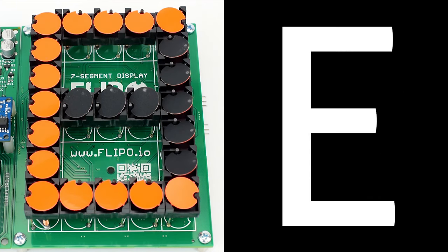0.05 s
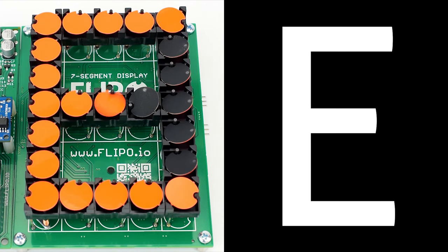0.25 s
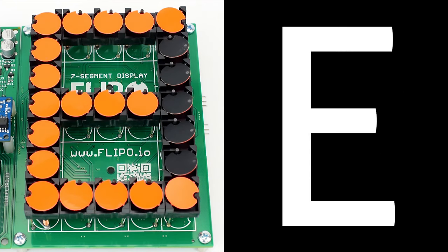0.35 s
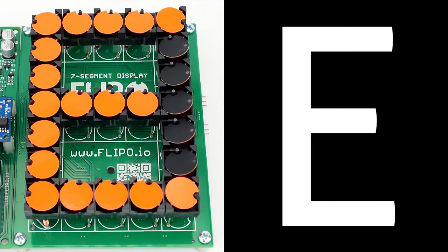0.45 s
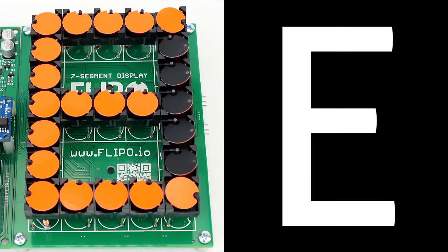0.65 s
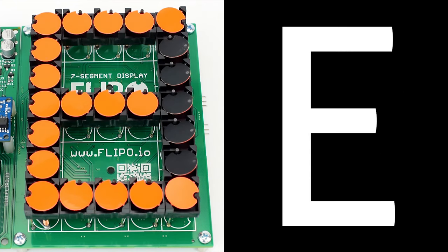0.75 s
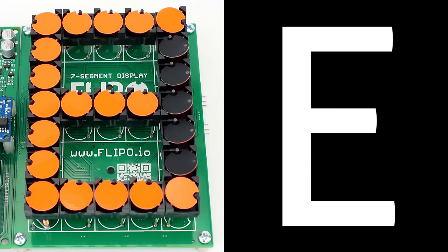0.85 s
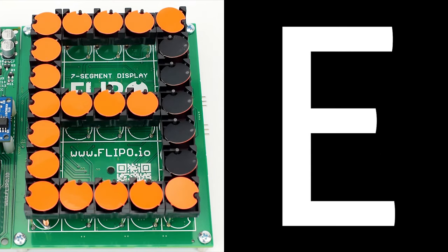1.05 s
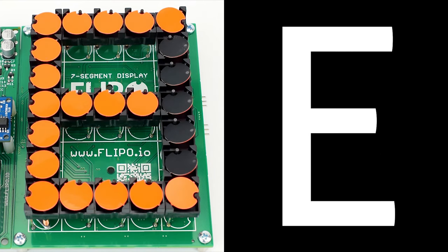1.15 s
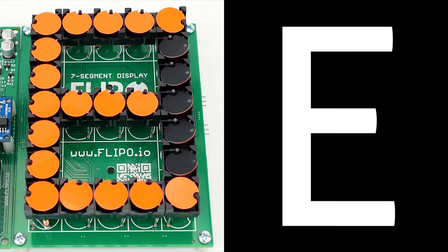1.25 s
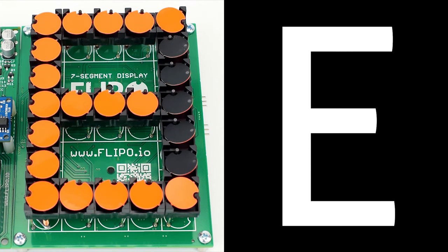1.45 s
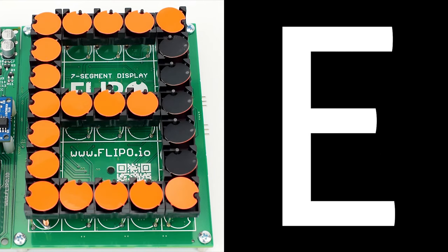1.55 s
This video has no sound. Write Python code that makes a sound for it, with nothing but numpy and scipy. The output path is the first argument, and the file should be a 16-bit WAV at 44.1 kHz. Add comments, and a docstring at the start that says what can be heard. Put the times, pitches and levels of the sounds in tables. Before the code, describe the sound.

Close up in a small quiet room, light plastic discs snap against their stops in a fast run of crisp double clicks with brief rattles, then only soft hiss and a barely audible late tick.

```python
"""Flip-disc display, close up

A few small plastic discs turn over, one every twentieth of a second; faint flips sound near the end.
Each slaps its stop, chatters and rebounds: clicks set damped modes of disc, frame and board ringing.
A quiet room adds dense noise reflections and a hiss of shaped noise bands.
Behind it lie a faint drone of narrow noise and a far cricket, a pulsed, wavering near sine.
"""
import sys
import numpy as np
from scipy import signal
from scipy.io import wavfile
from scipy.ndimage import uniform_filter1d

SR = 44100
rng = np.random.default_rng(int(sys.argv[2]) if len(sys.argv) > 2 else 0)


def to_wav(s):
    """Save 16-bit WAV."""
    ch = np.atleast_2d(s).T  # columns
    pcm = np.round(np.clip(ch, -1, 1) * 32767)  # PCM
    wavfile.write(sys.argv[1], SR, pcm.astype(np.int16))


def invert_db(level):
    """Linear amplitude ratio for a level in decibels (20 dB per decade), elementwise."""
    return 10 ** (np.asarray(level, dtype=float) / 20)


N = 70560  # samples, 1.6 s
TOUCH_SAMPLES = 6000  # longest chatter and ring of one touch


def rms_one(x):
    """Scale to rms 1."""
    return x / np.sqrt(np.mean(x ** 2) + 1e-20)


def at_hz(points, hz):
    """Read a spectrum on a log frequency axis."""
    point_hz, value = np.array(points).T
    return np.interp(np.log(hz), np.log(point_hz), value)


def ring(clicks, hz, t60):
    """A two-pole resonator: a unit click sets a sine of height 1 ringing, down 60 dB after t60 seconds."""
    radius, angle = invert_db(-60 / (t60 * SR)), 2 * np.pi * hz / SR
    feedback = [1, -2 * radius * np.cos(angle), radius ** 2]
    return signal.lfilter([0, np.sin(angle)], feedback, clicks + 1e-18)


def chatter(t60):
    """A contact is one click, then random tiny clicks of either sign that die away."""
    clicks_per_s, start_db, spread_db = 6000, -11, 3.5
    t = np.arange(TOUCH_SAMPLES) / SR
    luck_db = spread_db * np.minimum(rng.exponential(1, TOUCH_SAMPLES), 4)
    grains = invert_db(luck_db) * rng.choice([-1, 1], TOUCH_SAMPLES)
    hits = rng.random(TOUCH_SAMPLES) < clicks_per_s / SR
    clicks = grains * hits * invert_db(start_db - 60 * t / max(t60, .002))
    clicks[0] = 1
    # luck does not change the energy of a touch
    energy = 1 + clicks_per_s * invert_db(start_db) ** 2 * t60 / 3
    return clicks * np.sqrt(energy / np.sum(clicks ** 2))


def strike(clicks, modes, level_db, tilt):
    """The clicks excite each mode at a slightly different level, pitch and stereo place."""
    level_spread_db, pitch_spread = 1.5, .005  # pitch spread as a share of the frequency
    width_db = -11.5  # side against mid for a mode at 8 kHz; it widens in proportion to frequency
    out = np.zeros((2, TOUCH_SAMPLES))
    middle_hz = modes[len(modes) // 2][0]
    for k, (hz, mode_db, t60) in enumerate(modes):
        level_luck, side_luck, pitch_luck = rng.standard_normal(3)
        tilt_db = tilt * np.log2(hz / middle_hz)
        gain = invert_db(level_db + mode_db + tilt_db + level_spread_db * level_luck)
        tone = gain * ring(clicks, hz * (1 + pitch_spread * pitch_luck), t60)
        side = invert_db(width_db) * np.sign(side_luck) * hz / 8000
        out += (-1) ** k * tone * [[1], [side]]  # neighbouring modes start in opposite phase
    return out


# Ringing modes of the plastic disc, of the frame and of the circuit board.
# Each row: frequency in Hz, level within its part in dB, t60 in seconds.
DISC = [(6580, -8.5, 0.0055), (7060, -9, 0.012), (7130, -2, .008), (8080, -2.5, 0.0094), (8820, -7.5, .008),
        (9460, -11, 0.007), (9950, -6.5, .007), (10920, -11.5, 0.0082), (11900, -19, .004),
        (13000, -16, .003), (14700, -29, .003)]
FRAME = [(3120, -6, 0.0093), (3960, -5, .008), (4480, -4, 0.011), (5100, 0, 0.0062), (6070, -5, .006)]
BOARD = [(460, -20.5, 0.036), (509, -18.5, 0.037), (601, -23, 0.035), (730, -22, .025), (990, -16, .03),
         (1172, -13, .018), (1620, -5, 0.016), (1712, -10, 0.026), (1862, -5.5, 0.02), (2040, -6, 0.021),
         (2320, -2.5, 0.0078), (2940, -6.5, 0.007)]


def touch(clicks, db, board_db, frame_db, seat):
    """One contact rings disc, frame and board, each with one mode whose level depends on the seat."""
    disc_part_db, frame_part_db, board_part_db = -8.5, -8, -3
    _, ring_db, ping_db, knock_db, board_tilt = seat
    disc_modes = [(8772, ring_db, 0.014)] + DISC
    frame_modes = [(3696, ping_db, 0.016)] + FRAME
    board_modes = BOARD[:4] + [(899.6, knock_db, 0.032)] + BOARD[4:]
    disc = strike(clicks, disc_modes, db + disc_part_db, 0)
    frame = strike(clicks, frame_modes, db + frame_part_db + frame_db, 0)
    board = strike(clicks, board_modes, db + board_part_db + board_db, board_tilt)
    return disc + frame + board


# Every touch of a disc on its stop, slaps and rebounds alike.
# Each row: start in seconds, level in dB, board (mostly under 3 kHz) against that in dB,
# frame (about 3 to 6.5 kHz) against that in dB, chatter t60 in seconds.
TOUCHES = [(0.2095, -41.5, -14.5, -2, .008), (.2122, -37, -15, -8, 0.0079), (.2155, -41, -15, -20, 0.013),
           (.2317, -51.5, -3, 4.5, .04), (.2594, -22, -14.5, -11.5, 0.024), (.2622, -30.5, -7, -8, 0.023),
           (.2660, -31.5, -6, -3.5, 0.045), (.2790, -45.5, -1, -6, 0.036), (.2900, -59, 12, -9, 0.041),
           (.3086, -25.5, -11, -2, 0.0029), (.3113, -27, -8.5, -4.5, 0.036),
           (.3150, -31, -19.5, -12.5, 0.016), (.3290, -53.5, 8, 8, 0.061),
           (0.36, -20.5, -15.5, -7.5, 0.0068), (.3617, -26, -12, -21, 0.027), (.3655, -33.5, -5, -9, 0.033),
           (.3710, -50, 4, 0.5, 0.031), (.3843, -42, 0, 0, 0.033), (1.4610, -64, -7, -0.5, 0.059),
           (1.4780, -80.5, -4, 7, 0.6), (1.5130, -70, -3, -3, 0.12)]
# Each disc sits elsewhere on the board.
# Each row: in force from this time in seconds, level of its clearest disc ring in dB, frame ping in dB,
# board knock in dB, tilt of the board modes in dB per octave.
SEATS = [(.2, 2.5, 3, -5.5, 1.5), (.224, -2, -3, -13.5, 0.5), (.30, 4, -9, -12, 0),
         (.35, -0.5, -11, -15.5, -0.5), (1.4, 2, -4, -14, 2)]


def discs():
    """Small discs slap and rebound; parts this small radiate no bass."""
    thin_below_hz, dull_above_hz = 400, 15500
    pan_db = -0.35  # left minus right
    out = np.zeros((2, N + TOUCH_SAMPLES))
    for s, db, board_db, frame_db, chatter_t60 in TOUCHES:
        seat = [row for row in SEATS if row[0] <= s][-1]
        start = int(s * SR)
        sound = touch(chatter(chatter_t60), db, board_db, frame_db, seat)
        out[:, start:start + TOUCH_SAMPLES] += sound
    thin = signal.butter(6, thin_below_hz, "high", fs=SR, output="sos")
    dull = signal.butter(8, dull_above_hz, fs=SR, output="sos")
    mid, side = signal.sosfilt(np.vstack([thin, dull]), out[:, :N])
    return np.array([mid + side, mid - side]) * invert_db(pan_db * np.array([[.5], [-.5]]))


def room(x):
    """Dense reflections that build up fast and die away, mostly alike at both sides."""
    level_db, t60_s, build_s, width = -10.5, 0.17, 0.0021, 0.16  # width: side against mid
    t = np.arange(SR // 3) / SR
    envelope = invert_db(-60 * t / t60_s) * (1 - np.exp(-t / build_s))
    mid, side = rng.standard_normal((2, len(t))) * envelope
    mid = mid / np.linalg.norm(mid)
    side = width * side / np.linalg.norm(side)
    left = signal.fftconvolve(x, mid + side)[:N]
    right = signal.fftconvolve(x, mid - side)[:N]
    return invert_db(level_db) * np.array([left, right])


# Spectrum of the room hiss. Each row: frequency in Hz, relative level in dB per Hz.
HISS = [(18, -23.5), (30, -0.5), (190, -8), (240, -14), (437, -5), (735, -6), (978, -3), (1110, -4),
        (1300, -4), (4650, -11.5), (5030, -13), (12200, -22), (15000, -39)]
# How alike the hiss is at both sides. Each row: frequency in Hz, left-right correlation (1 is mono).
LIKENESS = [(60, 0.58), (180, 0.8), (550, 0.9), (1650, 0.41), (4970, 0.048), (15000, 0.061)]


def hiss():
    """Third-octave bands of stereo noise, each with its own level and likeness."""
    level_db, top_hz, settle = -73.5, 12750, 4000  # rms level; settle in samples, cut off the front
    out = 0
    edges = 25 * 2 ** np.arange(0, 9.4, 1 / 3)
    white = rng.standard_normal((2, 2, N + settle))
    for k, (low, high) in enumerate(zip(edges, edges[1:])):
        band = signal.butter(2, [low, high], "band", fs=SR, output="sos")
        # neighbouring bands draw on different noise
        mid, side = signal.sosfilt(band, white[k % 2])[:, settle:]
        hz = np.sqrt(low * high)
        alike = np.clip(at_hz(LIKENESS, hz), -1, 1)
        stereo = np.sqrt(1 + alike) * mid + np.sqrt(1 - alike) * side * [[1], [-1]]
        out = out + invert_db(at_hz(HISS, hz)) * stereo
    out = signal.sosfilt(signal.ellip(8, 1, 40, top_hz, fs=SR, output="sos"), out)
    return invert_db(level_db) * rms_one(out)


def drone():
    """Noise in a narrow resonance makes a faint wavering drone."""
    hz, width_hz, level_db = 984, 7.1, -87.5
    t60 = np.log(1000) / np.pi / width_hz
    return invert_db(level_db) * rms_one(ring(rng.standard_normal(N), hz, t60))


def cricket():
    """Even pulses of a wavering near sine whose pitch sags through each stroke."""
    top_hz, sag_hz, waver_hz, level_db = 5088, 80, 24, -90
    start_s, period_s, stroke_share = -.0145, .0603, .68  # share of the period that sounds
    part = ((np.arange(N) / SR - start_s) / period_s % 1) / stroke_share
    stroke = np.sqrt(np.clip(np.sin(np.pi * np.minimum(part, 1)), 0, 1))
    waver = rms_one(uniform_filter1d(rng.standard_normal(N), size=300))
    hz = top_hz - sag_hz * part + waver_hz * waver
    tone = np.sin(2 * np.pi * np.cumsum(hz) / SR)
    return invert_db(level_db) * rms_one(stroke * tone)


def scene():
    """Display, room and background."""
    near = discs()
    return near + room(near.mean(axis=0)) + hiss() + drone() + cricket()


def top_cut(x):
    """Nothing passes above the cut-off."""
    return signal.sosfilt(signal.butter(12, 16340, fs=SR, output="sos"), x)


def record(dry):
    """A small steady offset shifts the whole mix."""
    offset = -.00069  # of full scale
    mix = dry + offset
    return top_cut(mix)


dry = scene()
out = record(dry)
to_wav(out)
```